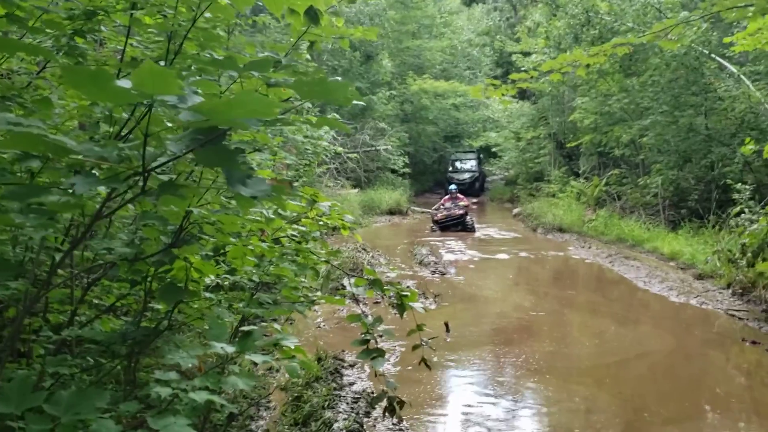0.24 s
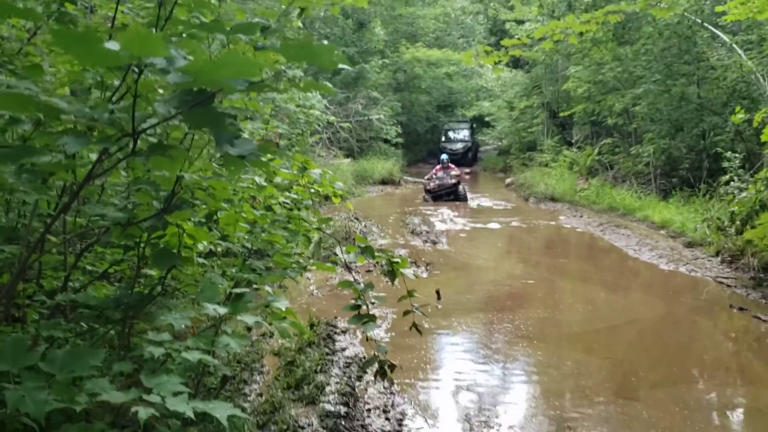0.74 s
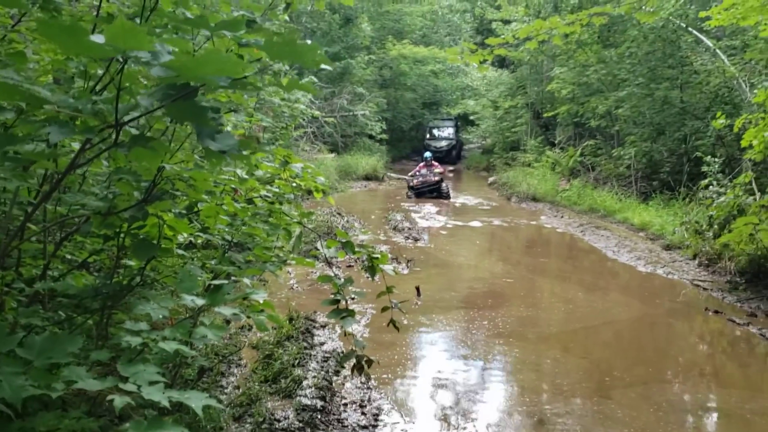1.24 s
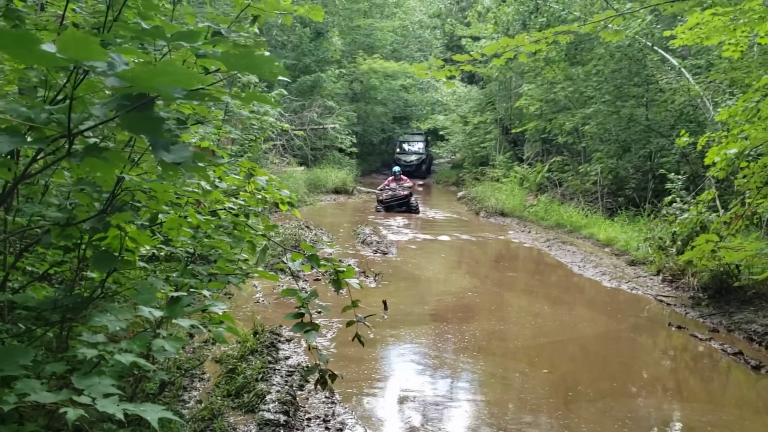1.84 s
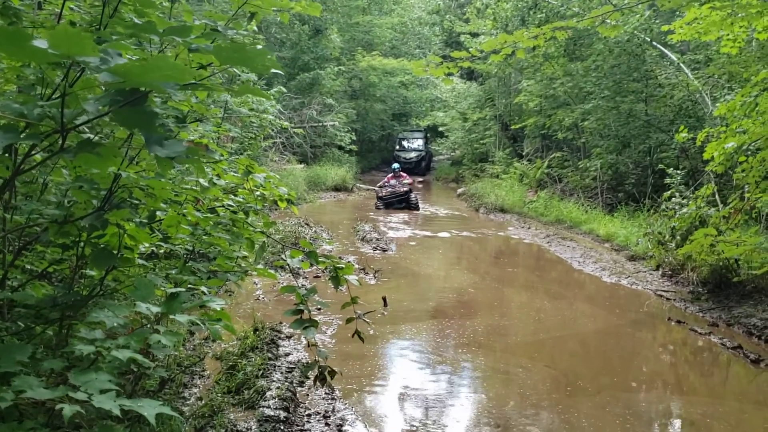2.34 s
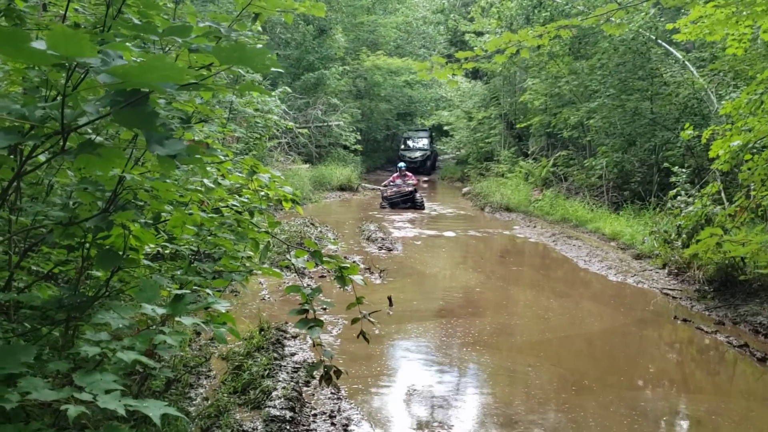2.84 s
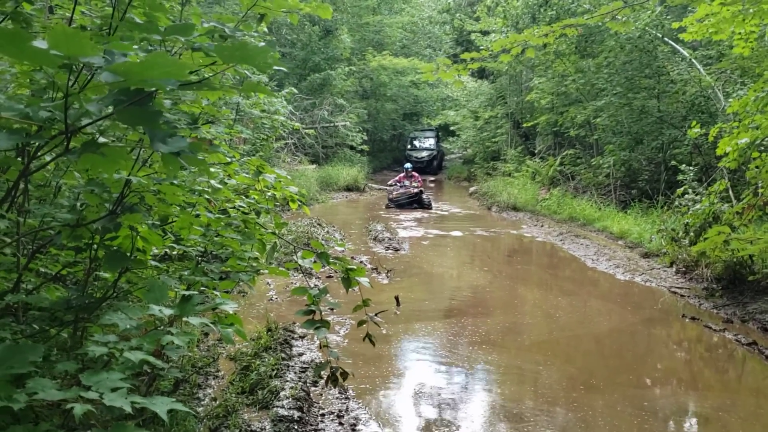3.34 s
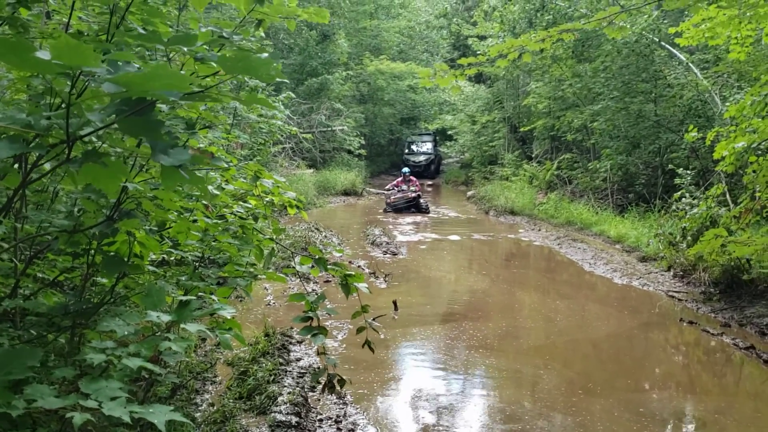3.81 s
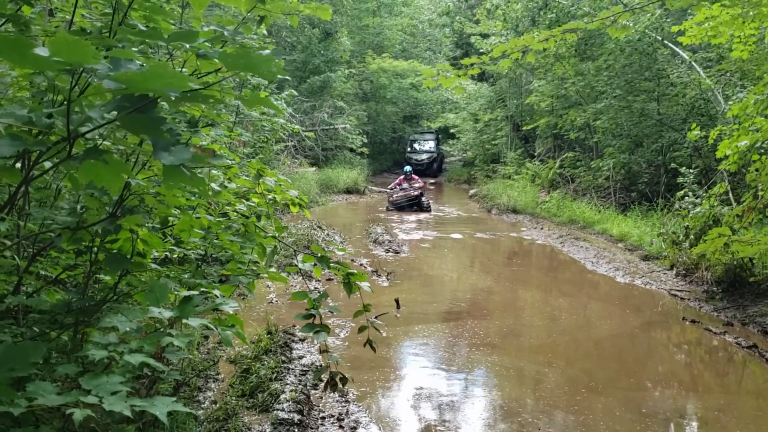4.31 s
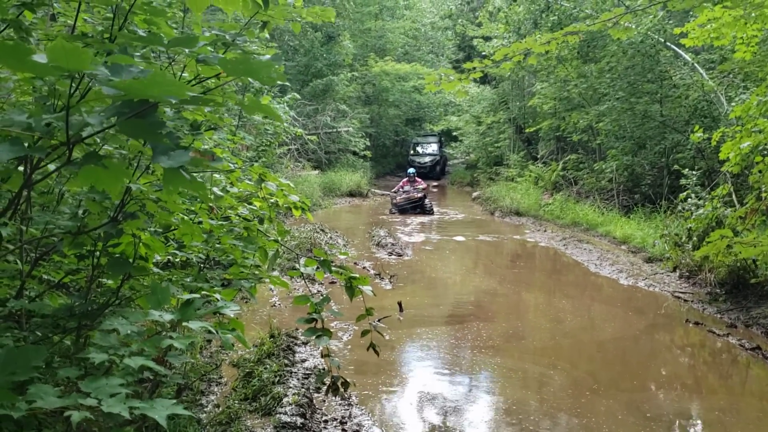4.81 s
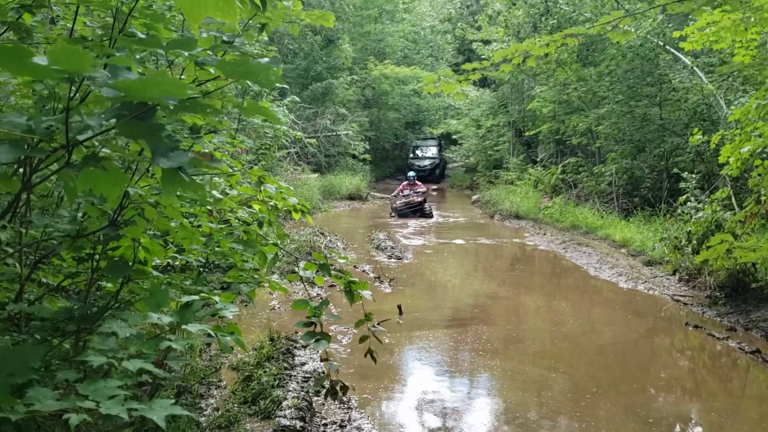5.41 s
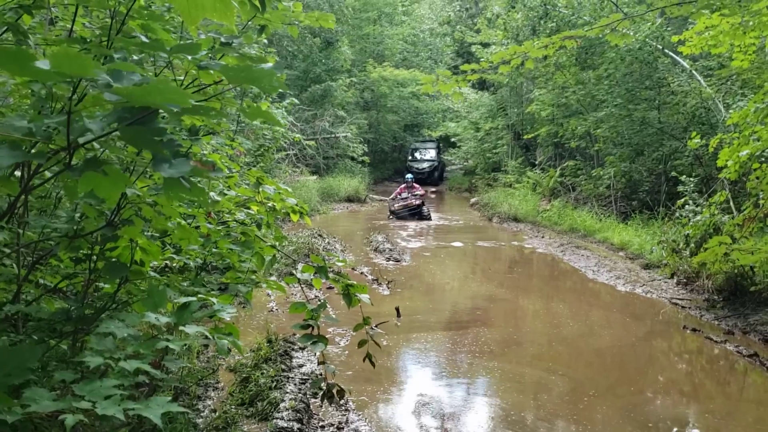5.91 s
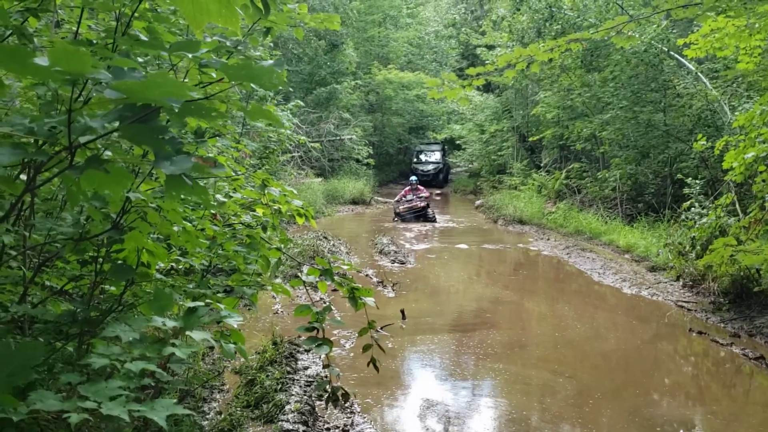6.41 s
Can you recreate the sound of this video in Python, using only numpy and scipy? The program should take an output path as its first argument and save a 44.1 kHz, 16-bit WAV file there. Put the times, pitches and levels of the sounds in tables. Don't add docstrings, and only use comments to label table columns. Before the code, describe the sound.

Outdoors among trees, heard from a distance on a small stereo microphone: a thumping quad exhaust works through muddy water, rattly first, then duller and more muffled as the pipe sinks. Bursts of crackling pops separate its three pushes before a slow, lumpy idle. Behind it a deeper engine rises early and hums to the end. Occasional water slops, faint insect whistles and a soft broad background roar, with a short woodland tail.

```python
import sys
import numpy as np
from scipy import signal
from scipy.fft import rfft, irfft, next_fast_len
from scipy.io import wavfile
from scipy.ndimage import uniform_filter1d

SR = 44100
rng = np.random.default_rng(int(sys.argv[2]) if len(sys.argv) > 2 else 0)


def unload_wav(signal):
    wavfile.write(
        sys.argv[1],
        SR,
        np.round(np.clip(np.atleast_2d(signal).T, -1, 1) * 32767).astype(np.int16),
    )


def linear_from_db(decibels):
    return 10 ** (np.asarray(decibels, float) / 20)


N = 293706
T = np.arange(N) / SR


def evened(x):
    return x / np.sqrt(np.mean(x ** 2) + 1e-20)


def read(points, hz):
    f, value = np.transpose(points)
    return np.interp(np.log(hz + 1), np.log(f + 1), value)


def colour(x, points, share=1):
    size = next_fast_len(x.shape[-1])
    gain = linear_from_db(share * read(points, np.fft.rfftfreq(size, 1 / SR)))
    return irfft(rfft(x, size) * gain, size)[..., :x.shape[-1]]


def fuzz(hz, width):
    r = np.exp(-np.pi * width / SR)
    noise = [1, 1j] @ rng.standard_normal((N, 2)).T
    slow = signal.lfilter([1], [1, -r], noise)
    return evened((slow * np.exp(2j * np.pi * hz * T)).real)


def drift(rate):
    partials = np.geomspace(rate / 20, rate, num=16)
    return evened(sum(np.sin(2 * np.pi * (f * T + rng.random())) / np.sqrt(f) for f in partials))


def ring(modes, rise, order=1):
    t = T[:9000]
    swell = (1 - np.exp(-t / rise)) ** order
    return -swell * sum(linear_from_db(db - 60 * t / t60) * np.sin(2 * np.pi * hz * t) for hz, db, t60 in modes)


def strikes(times, db, shape):
    train = np.zeros(N + SR)
    np.add.at(train, np.round(np.clip(times, 0, None) * SR).astype(int), linear_from_db(db))
    return signal.oaconvolve(train, shape)[:N]


def puff(fast, slow, slow_db, rise=0.0015):
    t = T[:3000]
    return (1 - np.exp(-t / rise)) * (np.exp(-(t / fast) ** 2) + linear_from_db(slow_db) * np.exp(-t / slow))


# pitch_hz, level_db (dB per Hz)
ROAR_SPECTRUM = [(200, -14.5), (350, -16), (500, -22), (700, -22.5), (900, -25.5), (1180, -21.5),
                 (1500, -23), (2260, -32), (3500, -35.5), (5500, -37), (7400, -43), (12000, -39.5),
                 (16000, -46.5)]
# pitch_hz, level_db
RUMBLE_SPECTRUM = [(25, -27), (45, -32), (70, -9.5), (120, -8.5), (200, -2.5), (300, -8.5), (450, -65),
                   (700, -34), (1000, -71)]
# pitch_hz, likeness (0 to 1)
PORT_LIKENESS = [(60, 1), (300, 1), (600, 0.8), (1200, 0.88), (2500, 0.08), (6000, 0.33), (15000, .1)]
ROAR_DB, ROAR_PER_RATTLE, RUMBLE_DB = -50.5, 0.085, -37


def wash():
    frames, hz = N // 256 + 5, np.fft.rfftfreq(1024, 1 / SR)
    a, b, c, d, patches = rng.standard_normal((frames, 513, 5)).T
    patches = uniform_filter1d(patches, size=12, axis=0)
    patches = evened(uniform_filter1d(patches, size=10, axis=1))
    same = np.clip(read(PORT_LIKENESS, hz), 0, 1)[:, None]
    right = a + 1j * b
    left = same * right + np.sqrt(1 - same ** 2) * (c + 1j * d)
    z = np.array([left, right]) * linear_from_db(1.5 * patches)
    noise = signal.istft(z, nperseg=1024, noverlap=768)[1][:, :N]
    rattle_db = load(T)[2]
    roar_db = ROAR_DB + ROAR_PER_RATTLE * uniform_filter1d(rattle_db + 45, size=8000)
    roar = linear_from_db(roar_db + 9.5) * evened(colour(noise, ROAR_SPECTRUM))
    return roar + linear_from_db(RUMBLE_DB) * evened(colour(noise[:, ::-1], RUMBLE_SPECTRUM))


# pitch_hz, width_hz, level_db
INSECT_TONES = [(3827, 97, -66), (5480, 93, -72.5), (6030, 87, -87)]


def insects():
    return np.array([sum(linear_from_db(db + 1.8 * drift(25)) * fuzz(hz, width) for hz, width, db in INSECT_TONES)
                     for port in range(2)])


# pitch_hz, t60_s
TREE_DECAY = [(100, 0.23), (500, 0.37), (2000, 0.64), (8000, 0.17), (16000, 0.25)]


def trees(x):
    taps = np.zeros((2, SR // 2))
    jitter = rng.integers(0, 20, (2, (SR // 2 - 201) // 20))
    at = np.arange(200, SR // 2 - 20, 20) + jitter
    np.put_along_axis(taps, at, rng.choice([-1., 1.], at.shape), 1)
    hz, t, z = signal.stft(taps, SR, nperseg=256)
    tail = signal.istft(z * linear_from_db(-60 * t / read(TREE_DECAY, hz)[:, None]), SR, nperseg=256)[1]
    return signal.fftconvolve(x[None], tail / np.linalg.norm(tail[0]), axes=1)[:, :N]


# time_s, half_firing_hz (half its main firing note), level_db
DRONE_COURSE = [(0.0, 35.5, -24.5), (0.24, 37.2, -27), (0.6, 37.3, -27), (0.95, 38.5, -27), (1.35, 42, -28),
                (1.54, 42.5, -25), (1.63, 45.3, -22), (1.84, 56.5, -21.5), (2.15, 59.8, -22),
                (2.55, 54.6, -23.5), (2.89, 53.5, -22), (3.2, 55.6, -22.5), (3.65, 54.4, -22.5),
                (4.7, 54.5, -22), (4.85, 55.5, -22), (6.15, 56.4, -20.5), (6.66, 59.6, -19)]
# pitch_hz, level_db
DRONE_RESONANCE = [(30, -11.5), (55, -16.5), (80, -6.5), (112, 4.5), (135, -3.5), (165, -9), (220, -13.5),
                   (280, -20.5), (340, -41.5), (430, -34), (540, -44.5), (700, -46), (900, -49.5)]


def drone():
    s, hz, db = np.transpose(DRONE_COURSE)
    hz = uniform_filter1d(np.interp(T, s, hz), size=3000) * (1 + 0.0039 * drift(9))
    phase = 2 * np.pi * np.cumsum(hz) / SR
    orders = 0
    for k in np.arange(2, 29) / 2:
        order_db = read(DRONE_RESONANCE, k * hz) - 17.8 * (k % 1 > 0) + 1.8 * drift(14)
        orders = orders + linear_from_db(order_db) * np.cos(k * phase + .7 * k * k)
    return np.sqrt(2) * linear_from_db(np.interp(T, s, db)) * orders


# start_s, peak_db, centre_hz, length_s
WATER_SLAPS = [
    (0.348, -30, 1250, 0.03),
    (0.358, -41.5, 2900, 0.032),
    (2.82, -38, 646.5, 0.05),
    (2.844, -41, 640, 0.018),
    (3.731, -35.5, 652.3, .025),
]


def slaps():
    total = 0
    for s, db, hz, length in WATER_SLAPS:
        burst = strikes(np.array([s]), db + 5.5, puff(length / 4, length, -17.5))
        total = total + burst * fuzz(hz, 0.5 * hz + 6 / length)
    return total


# time_s, firing_hz
FIRING_RATE = [(0.0, 20.83), (0.604, 23.91), (0.983, 24.42), (1.308, 24.46), (1.747, 24.34), (2.003, 19.55),
               (2.363, 13.64), (2.364, 16.86), (2.816, 21.87), (3.396, 25.22), (3.658, 24.63),
               (4.137, 14.15), (4.578, 21.15), (4.729, 21.96), (4.816, 17.3), (5.218, 13.84),
               (5.685, 11.44), (6.66, 11.5)]
# open_s (throttle opens), hardest_s, shut_s
THROTTLE_PUSHES = [
    (-0.05, 0.55, 1.82),
    (2.6, 3.27, 3.76),
    (4.4, 4.55, 4.74),
]
# rattle_db, shell_db, knock_db, crack_db
PUSH_LEVELS = [
    (-36, -36, -30.5, -42.5),
    (-49, -43.5, -28, -37),
    (-68.5, -49.5, -34.5, -43),
]
OPEN_DB_PER_S, SHUT_DB_PER_S = 52, 44
EASE_DB = 12
BARK_DB, COAST_BARK_DB, COAST_DB_PER_HZ = -16.5, -29.5, 1.59
THUMP_DB, COAST_THUMP_DB, THUMP_PER_RATTLE = -22.5, -16.5, 0.37
IDLE_RATTLE_DB, IDLE_CRACK_DB = -66, -57


def load(t):
    opened, hardest, shut = np.transpose(THROTTLE_PUSHES)[..., None]
    rattle_db, shell_db, knock_db, crack_db = np.transpose(PUSH_LEVELS)[..., None]
    effort = np.minimum(0, np.minimum(OPEN_DB_PER_S * (t - opened), SHUT_DB_PER_S * (shut - t)))
    before_peak = (hardest - t) / (hardest - opened)
    after_peak = (t - hardest) / (shut - hardest)
    off_peak = np.clip(np.maximum(before_peak, after_peak), 0, 1)
    coast = COAST_BARK_DB + COAST_DB_PER_HZ * (np.interp(t, *np.transpose(FIRING_RATE)) - 15)
    bark = np.maximum(BARK_DB + 1.2 * effort.max(axis=0), coast)
    rattle, shell, knock = (np.maximum((db + effort).max(axis=0), IDLE_RATTLE_DB)
                            for db in (rattle_db, shell_db, knock_db))
    crack = np.maximum((crack_db - EASE_DB * off_peak + 3.6 * effort).max(axis=0), IDLE_CRACK_DB)
    working = linear_from_db(effort.max(axis=0))
    thump = COAST_THUMP_DB + working * (THUMP_DB - COAST_THUMP_DB + THUMP_PER_RATTLE * (rattle + 45))
    return thump, bark, rattle, shell, knock, crack


# start_s, peak_db, hollow_ring_db, thump_db
THROTTLE_POPS = [(1.9514, -33, -39, -5), (2.0028, -31.5, -72, -34), (2.055, -41.5, -50, -8),
                 (2.685, -34, -42, -34), (3.217, -44, -48, -43), (3.258, -40, -42, -28),
                 (3.886, -35.5, -44, -22), (3.938, -33.5, -41, -17), (3.9948, -34.5, -43, -30),
                 (4.116, -39.5, -49, -6.5), (4.3721, -31.5, -38.5, -22), (4.4271, -35.5, -41, -36),
                 (4.4777, -36, -48, -14), (4.529, -35.5, -58, -34), (4.577, -42, -40, -36),
                 (4.815, -33.5, -39.5, -24), (4.8715, -32, -53, -12)]
# each pitch_hz, level_db, t60_s
SILENCER_MODES = [(54.5, -3.5, 0.085), (83.6, 1, 0.1)]
PIPE_MODES = [(134.7, 5, 0.078), (191.6, -15, 0.047), (290.6, -10.5, 0.068)]
SHELL_MODES = [(339, 10, 0.055), (384, 10.5, 0.039), (478, 1, 0.02), (1551, -6.5, 0.016),
               (2244, -7.5, 0.012), (2587, -23, 0.01), (3255, -16, 0.059), (4980, -22, 0.069)]
KNOCK_MODES = [(690, 4.5, 0.022), (884, -10.5, 0.062)]
# pitch_hz, level_db
JET_SPECTRUM = [(300, -39), (700, -14), (1400, -5.5), (2200, -3.5), (3500, -2), (5000, -2.5), (7400, -6),
                (9000, -5.5), (12000, -1), (16000, -13)]
FIRST_TURN = -0.917
THUMP_LAG_S, BARK_LAG_S, RATTLE_LAG_S, KNOCK_LAG_S = -.0015, .0009, -.005, -.002
RATTLE_SCATTER_S = .0002


def quad():
    turns = FIRST_TURN + np.cumsum(np.interp(T, *np.transpose(FIRING_RATE))) / SR
    luck = np.clip(rng.standard_normal((140, 8)), -1.7, 1.7)[:127]
    at = np.interp(np.arange(-1, 126), turns, T) + .00015 * luck[:, 0]
    spread_db = [2.5, 1.3, 1.0, 1.2, 1.5, 2.2]
    levels = [db + spread * luck[:, k + 1] for k, (db, spread) in enumerate(zip(load(at), spread_db))]
    thump, bark, rattle, shell, knock, crack = levels
    pop_s, pop_db, pop_ring_db, pop_thump_db = np.transpose(THROTTLE_POPS)

    low = strikes(at + THUMP_LAG_S, thump + 6, ring(SILENCER_MODES, 0.0031))
    low += strikes(pop_s + THUMP_LAG_S, pop_thump_db, ring(SILENCER_MODES, 0.008))
    low += strikes(at + BARK_LAG_S, bark + 9, ring(PIPE_MODES[:2], 0.0067))
    low += strikes(at + RATTLE_LAG_S, bark + 9, ring(PIPE_MODES[2:], 0.0047, order=2))
    rattle_s = at + RATTLE_LAG_S + RATTLE_SCATTER_S * luck[:, 7]
    low += strikes(rattle_s, rattle + 8, ring(SHELL_MODES[:3], 0.002, order=2))

    hollow = strikes(at + KNOCK_LAG_S, knock, ring(KNOCK_MODES, 0.0038))
    hollow += strikes(pop_s + KNOCK_LAG_S, pop_ring_db + 10, ring(KNOCK_MODES, 0.0018))
    shell_noise = sum(linear_from_db(db) * fuzz(hz, 9 / t60) for hz, db, t60 in SHELL_MODES[3:])
    shell_ring = strikes(at, shell + 3, puff(0.0064, 0.019, -5.5)) * shell_noise
    whine_level = linear_from_db(np.interp(T, at, rattle) - 14 + 4 * drift(30))
    whine = whine_level * np.sin(2 * np.pi * 34.4 * turns + 2.2 * drift(60))

    jet = strikes(at, crack + 3.8, puff(0.0032, 0.011, -12.0))
    jet += strikes(pop_s, pop_db + 0.4, puff(0.0021, 0.014, -14.5))
    hiss = rng.standard_normal((N, 2)).T
    hiss[0] = 0.06 * hiss[1] + 1.1 * hiss[0]
    jet = jet * evened(colour(hiss, JET_SPECTRUM)) * linear_from_db([[-3], [0]])
    return low, shell_ring + hollow + whine, jet


def scene():
    background = wash() + insects()
    low, mid, jet = quad()
    mid = mid + slaps()
    return background + drone() + linear_from_db(-12) * trees(mid + jet[1]) + low + mid + jet


def band_limit(x):
    return signal.sosfilt(signal.butter(12, 15780, fs=SR, output="sos"), x)


# pitch_hz, lag_samples
LEFT_LAG = [(100, 14), (700, 10.6), (1500, 14.96), (2300, 19.9), (16000, 19.8)]
# pitch_hz, left_gain_db (the right port gets -0.44 times it)
PORT_BALANCE = [(60, -4), (110, -2), (200, -3), (380, -0.5), (700, -2.5), (1290, -2), (2380, -2.5),
                (4400, -3.5), (8120, -10), (15000, -12)]
# pitch_hz, level_db
RIGHT_DUCT_RESPONSE = [(20, -4.5), (6000, -0.5), (6900, -9.5), (7500, -7), (8300, -5.5), (9100, 0.5),
                       (10600, -5), (12000, 2.5), (13400, -3.5), (15300, 2.5)]
BASS_CUT_HZ = 41.8


def record(dry):
    size = next_fast_len(N)
    hz = np.fft.rfftfreq(size, 1 / SR)
    delay = np.exp(-2j * np.pi * hz * read(LEFT_LAG, hz) / SR)
    left = colour(irfft(rfft(dry[0], size) * delay, size)[:N], PORT_BALANCE)
    right = colour(colour(dry[1], PORT_BALANCE, -0.44), RIGHT_DUCT_RESPONSE)
    bass_cut = signal.butter(4, BASS_CUT_HZ, "high", fs=SR, output="sos")
    return band_limit(signal.sosfilt(bass_cut, np.array([left, right])))


dry = scene()
out = record(dry)
unload_wav(out)
```